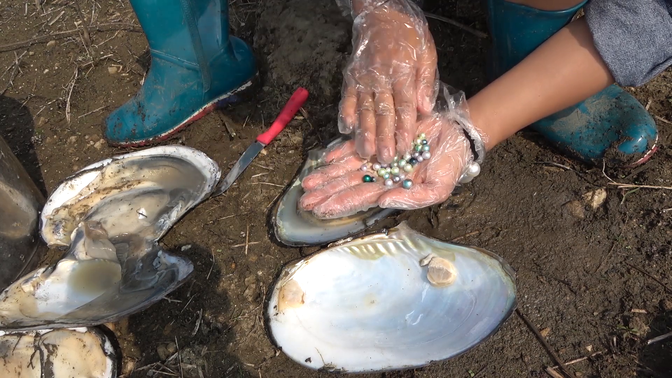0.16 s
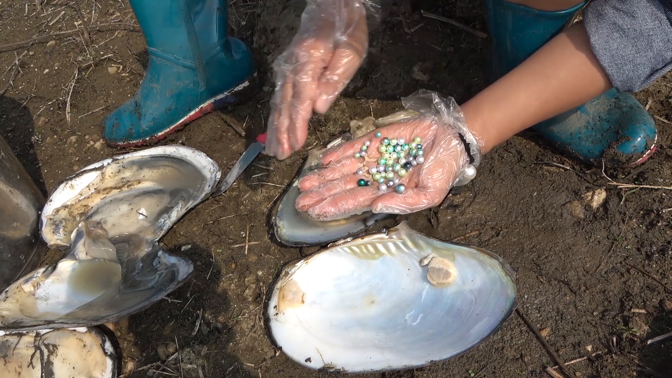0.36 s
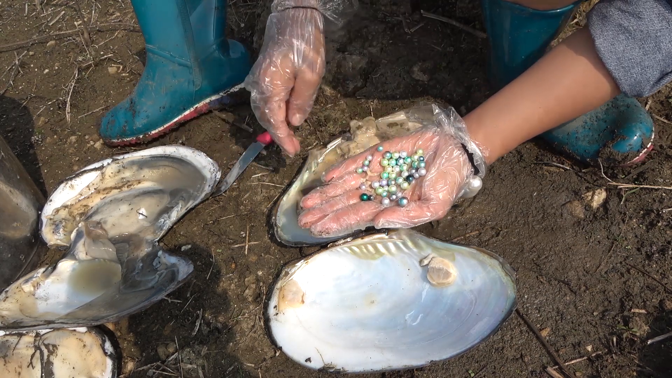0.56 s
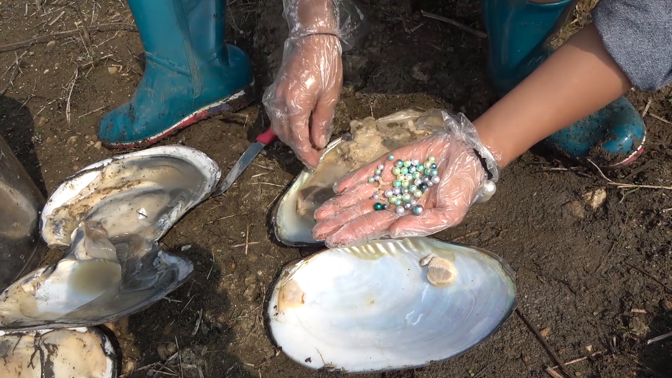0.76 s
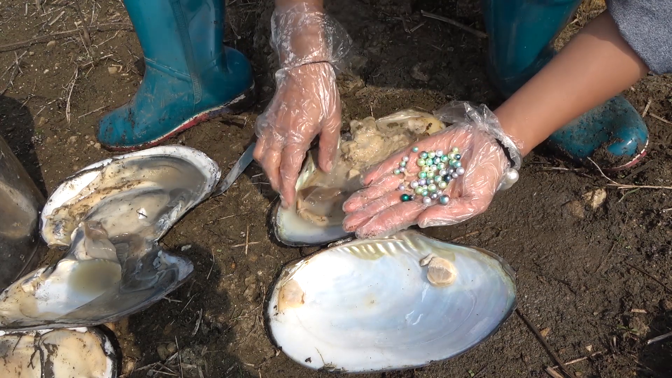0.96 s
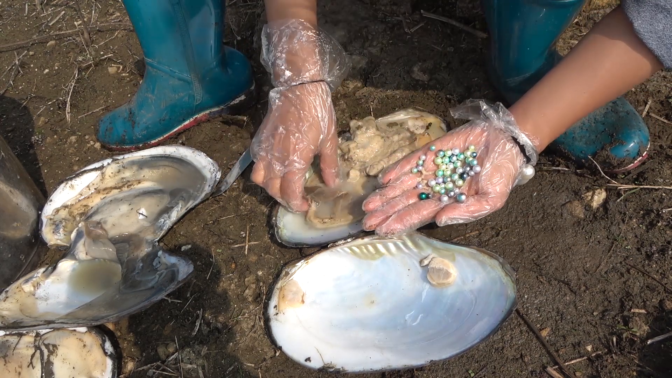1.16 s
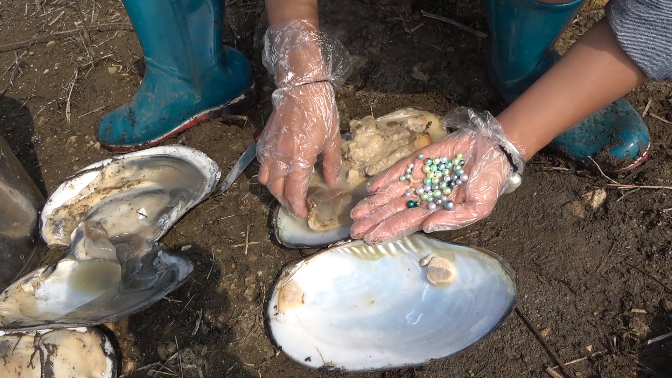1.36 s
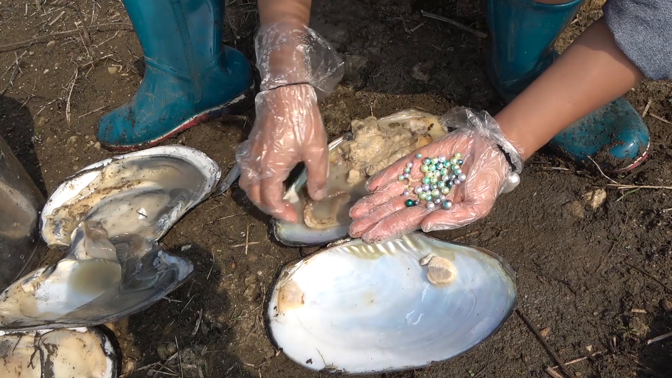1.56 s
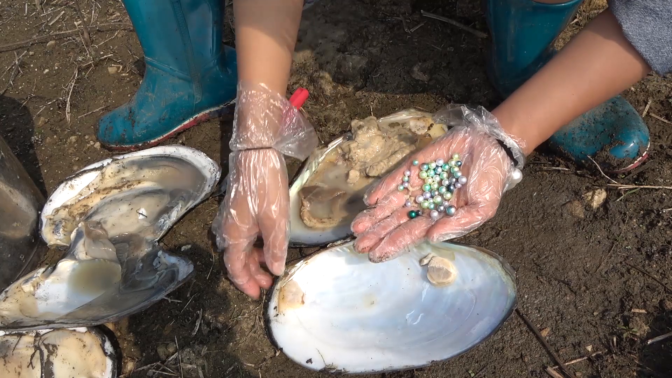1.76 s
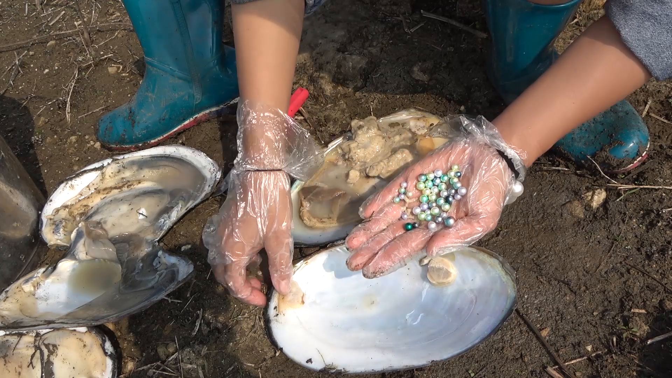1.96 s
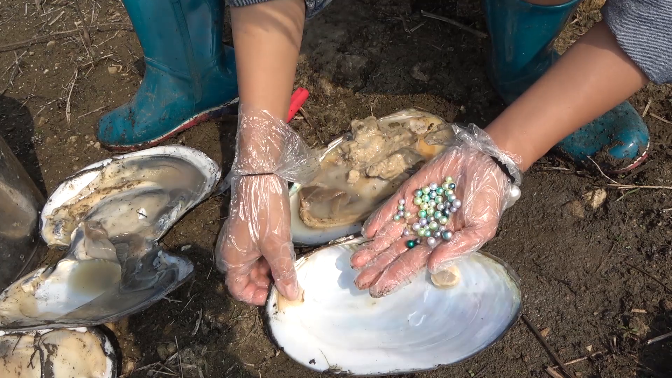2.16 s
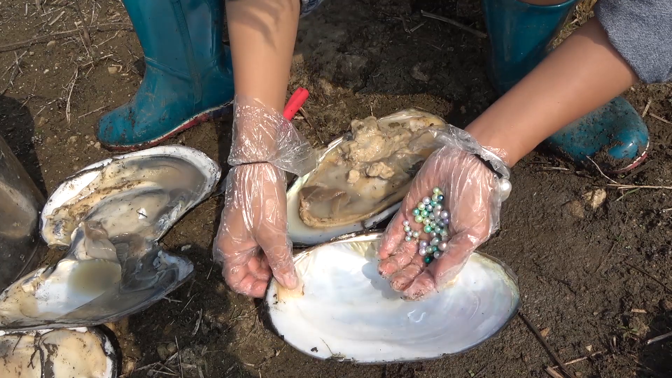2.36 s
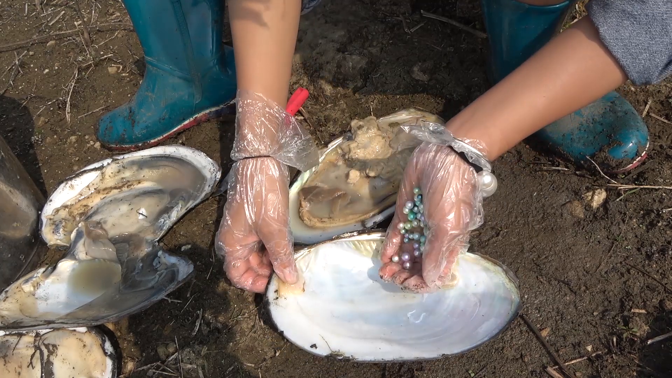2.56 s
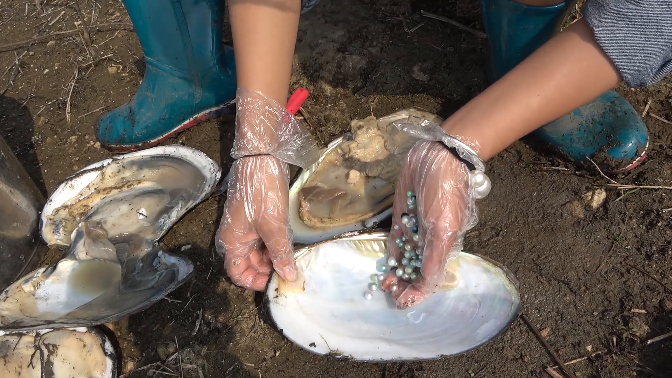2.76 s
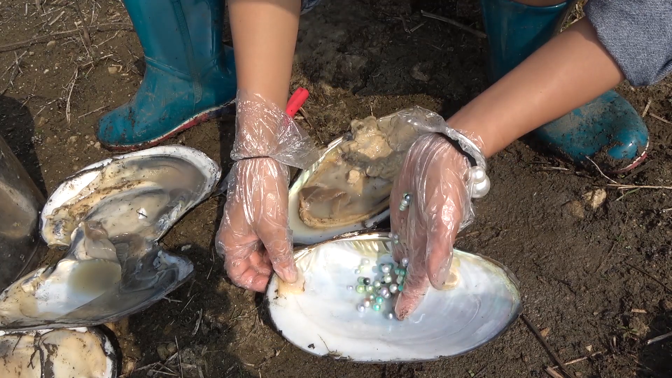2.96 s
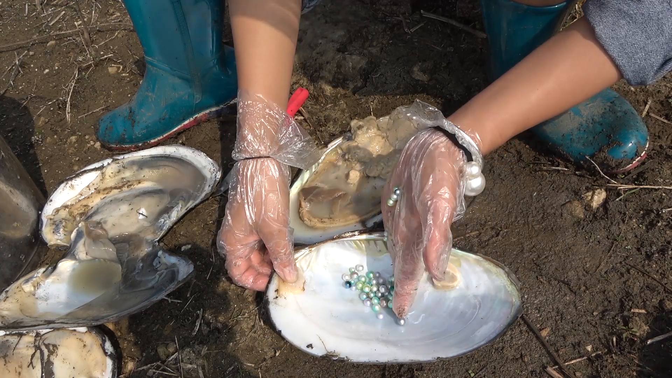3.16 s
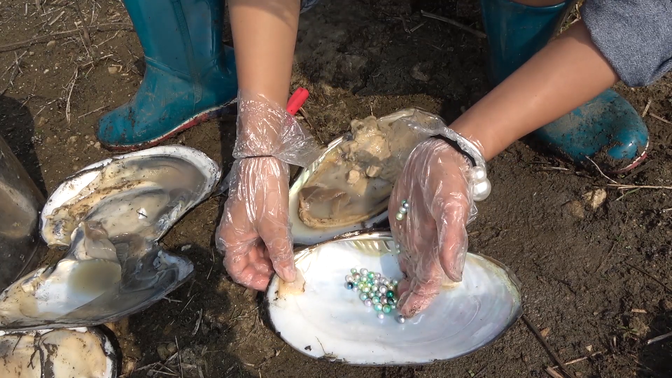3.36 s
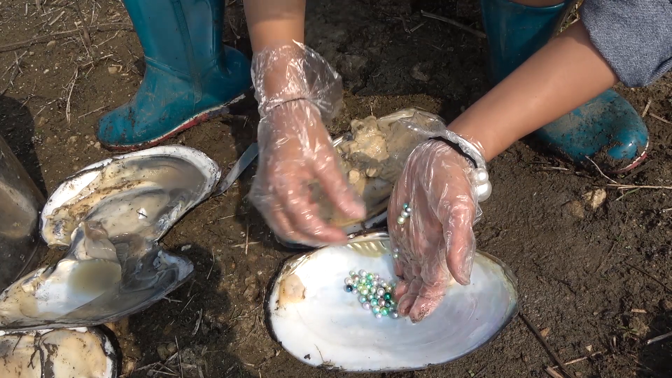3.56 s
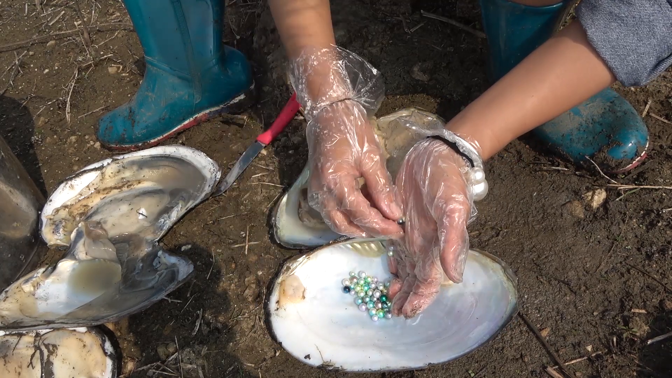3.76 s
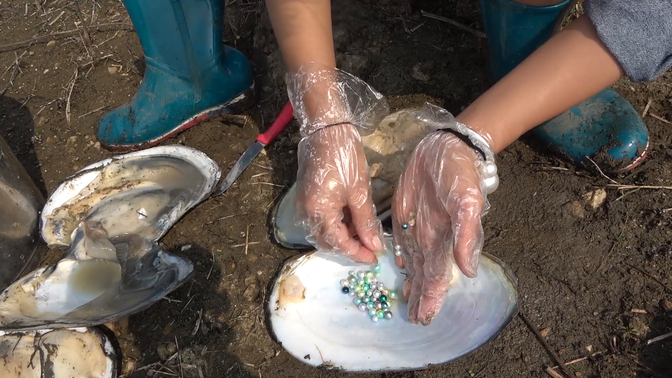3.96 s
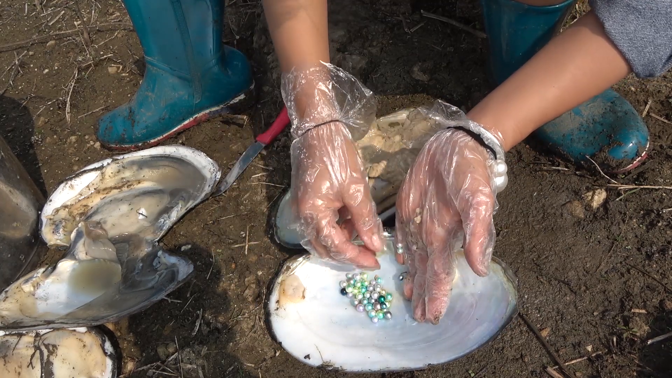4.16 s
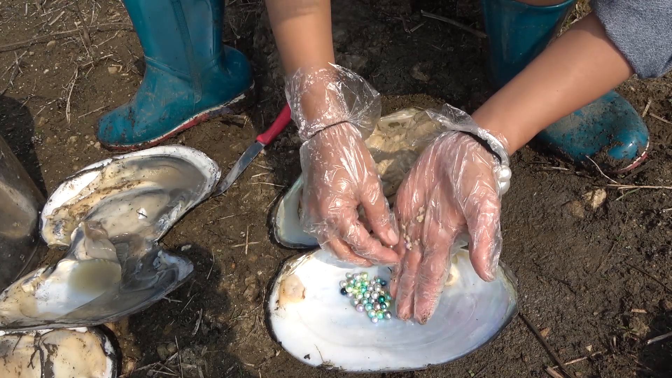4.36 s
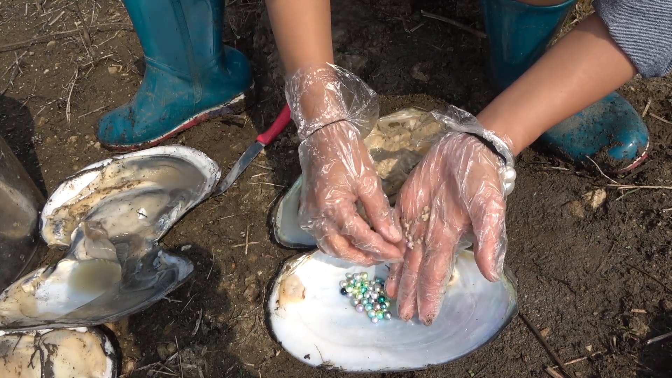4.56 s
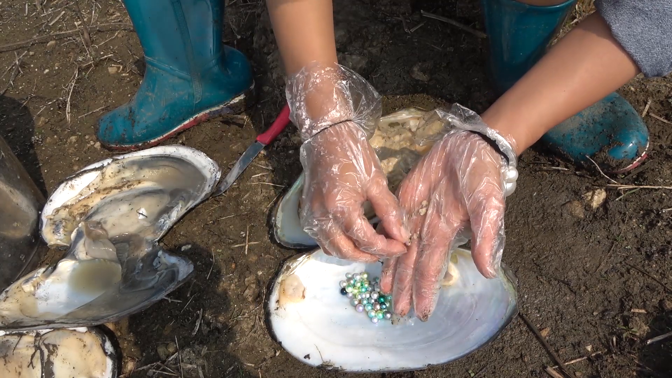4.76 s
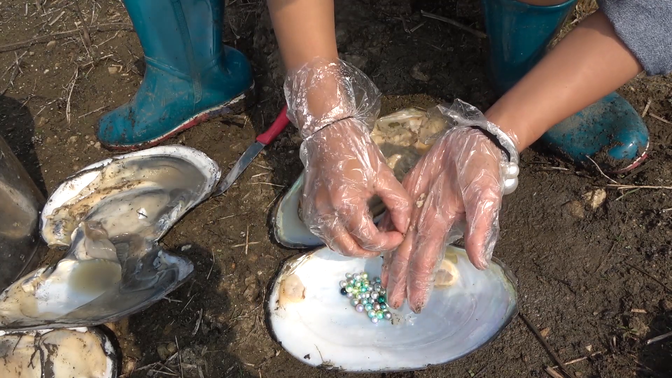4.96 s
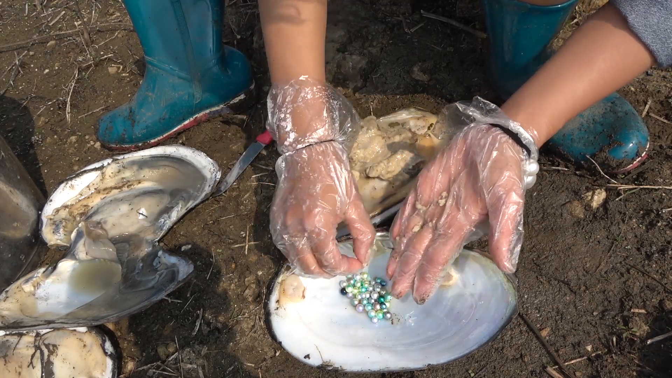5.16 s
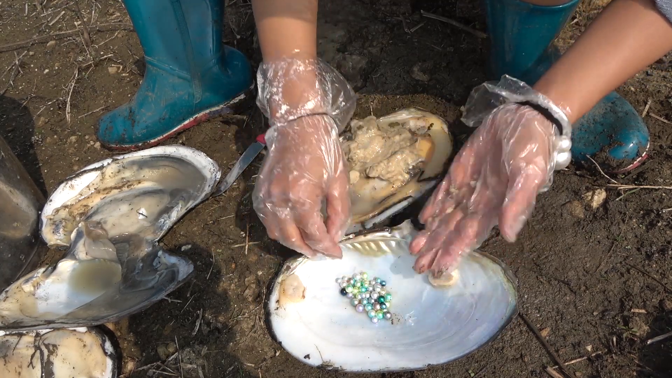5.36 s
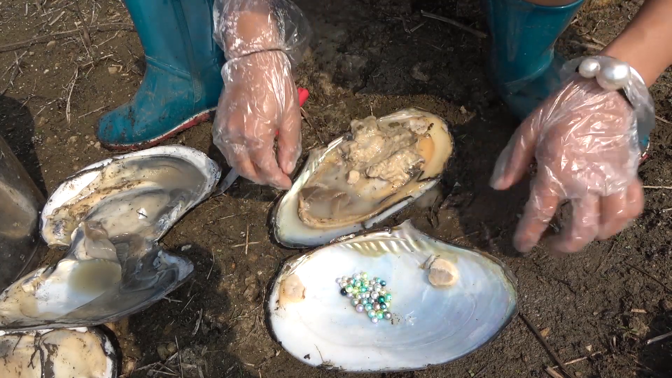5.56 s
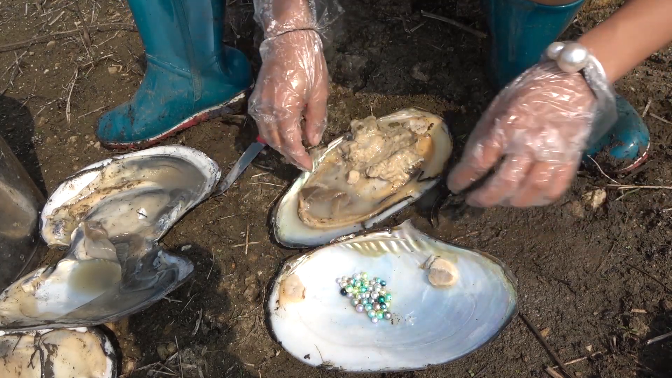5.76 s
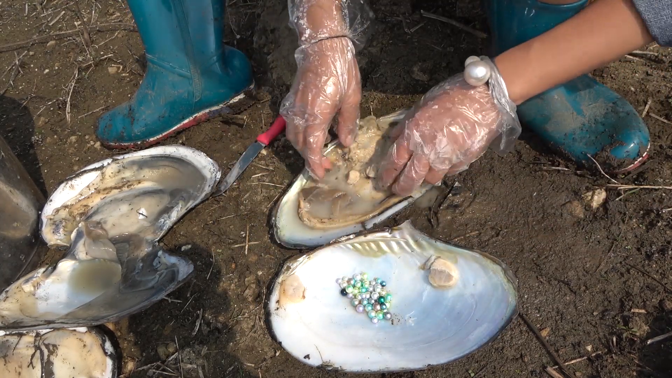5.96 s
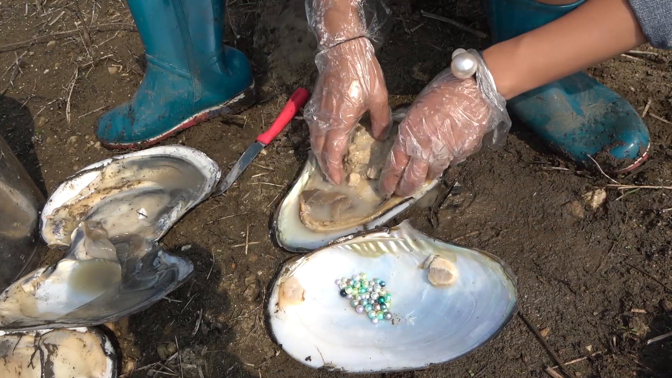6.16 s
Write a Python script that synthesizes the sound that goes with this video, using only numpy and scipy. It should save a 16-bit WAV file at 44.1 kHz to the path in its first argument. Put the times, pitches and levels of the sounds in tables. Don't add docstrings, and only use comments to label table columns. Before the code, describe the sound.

Thin plastic gloves crinkle and snap, then a palmful of pearls patters brightly into an empty mussel shell, with a scrape and a few last drops outdoors.

```python
import sys
import numpy as np
from scipy import signal
from scipy.io import wavfile

SR = 44100
rng = np.random.default_rng(int(sys.argv[2]) if len(sys.argv) > 2 else 0)


def to_wav(s):
    ch = np.atleast_2d(s).T
    pcm = np.round(np.clip(ch, -1, 1) * 32767)
    wavfile.write(sys.argv[1], SR, pcm.astype(np.int16))


def decibels_to_gain(level_db):
    exponent = np.asarray(level_db, float) / 20
    return 10 ** exponent


N = 273861

# [f/Hz, likeness 0..1]
AIR_SPECTRUM = [(21, -29), (35, -10.5), (115, -2.5), (310, -10), (442, -9.5), (630, -19), (734, -15),
                (7760, -19), (12900, -29), (15000, -26)]
AIR_LIKENESS = [(60, 0.97), (240, 0.86), (950, 0.88), (3770, 1), (15000, 0.31)]
AIR_DB = -52.5
# [f/Hz, width/Hz, level/dB]
PUMP_LINES = [(117.8, 17, -62), (169.4, 17, -68)]
# [t/s, level/dB]
PUMP_WHINE = [(3.4, -84), (3.7, -60.5), (4.9, -64), (5.2, -72), (5.8, -61), (6.21, -62)]
HUM_HZ, HUM_DB = 48.8, -58
# [peak t/s, level/dB]
GUSTS = [(0.0, -61), (1.71, -60), (2.3, -48), (2.47, -57), (2.62, -54), (2.97, -50), (3.72, -52),
         (4.1, -56), (4.46, -59), (5.11, -54), (5.63, -51.5), (5.85, -57), (6.1, -48)]
GUST_BUILD_S, GUST_LOSE_S, CALM_DB = .11, .1, -66
# [t/s, level/dB, width/ms]
PUFFS = [
    (2.247, -30, 5.0),
    (2.303, -28.5, 3.2),
    (2.319, -32, 4.0),
]
REBOUND_WIDTHS, REBOUND_DB = 2.2, -1.5
# [t/s, left minus right level/dB]
HAND_PLACE = [(0.0, -0.5), (1.21, 0.0), (3.03, -1), (3.86, 0.5), (3.96, -0.5), (5.29, -0.5), (5.67, -3.0),
              (6.21, -0.5)]
# [peak t/s, level/dB, 10 dB build/s, 10 dB loss/s]
HAND_MOVES = [(0.095, -37, .12, .05), (0.32, -43, .22, .07), (0.53, -44.5, .22, .35), (1.05, -44, .3, .12),
              (1.21, -46.5, .15, .1), (1.44, -45, .11, .13), (1.58, -44.5, .06, .08), (1.72, -47, .1, .6),
              (2.0, -50, .8, .08), (2.19, -41.5, .07, .9), (2.42, -38, .2, .45), (3.05, -40.5, .6, .3),
              (3.35, -42, .05, .14), (3.52, -41, .06, .06), (3.64, -40.5, .14, .12),
              (3.83, -39.5, .24, .07), (3.93, -42, .08, .2), (4.3, -41.5, .24, .07), (4.43, -41, .08, .12),
              (4.62, -48, .2, .5), (4.9, -45, .18, .25), (5.07, -44.5, .4, .16), (5.28, -42, .1, .16),
              (5.47, -39.5, .1, .3), (5.58, -36, .2, .15), (5.66, -36, .2, .07), (5.85, -40, .17, .8),
              (6.07, -39, .25, .3)]
# [peak t/s, level/dB, 10 dB build/s, 10 dB loss/s]
FINGER_RUBS = [(0.76, -53, .1, .05), (1.48, -51, .08, .1), (1.73, -53, .06, .3), (1.96, -55, .3, .06),
               (2.16, -49, .06, .3), (2.42, -48, .25, .22), (2.83, -55, .12, .08), (3.25, -44.5, .06, .04),
               (3.36, -52, .06, .06), (3.57, -51, .1, .13), (4.09, -50.5, .04, .25),
               (5.65, -48.5, .18, .07)]
FILM_REST_DB, RUB_UNDER_FILM_DB = -58, -18
# [f/Hz, level/dB]
FILM_SPECTRUM = [(1800, -29), (2500, -5.5), (3500, -2), (5000, -2.5), (7000, 2), (9500, -2.5),
                 (12500, -5.5), (15500, -40)]
RUB_SPECTRUM = [(800, -8), (1100, 2.5), (1500, 0.5), (2000, -2), (2600, 0)]
# [t/s, peak level/dB, pitch f/Hz]
SNAPS = [(0.0751, -25, 6800), (0.0876, -19.5, 9400), (0.0966, -18, 7600), (0.184, -34, 6700),
         (0.33, -29, 7900), (1.4415, -29, 7750), (1.5858, -26, 8000), (2.025, -30, 5200),
         (2.0622, -31, 7140), (2.5736, -29, 7600), (2.5846, -23, 8250), (2.605, -25, 8300),
         (2.6478, -22, 8500), (2.652, -26, 6400), (2.6814, -28, 8000), (2.7237, -25, 10100),
         (2.7316, -28, 5950), (2.742, -26, 5400), (2.7653, -23, 7900), (2.7693, -21, 7600),
         (3.7627, -26, 7500), (3.821, -24, 7500), (3.9498, -29, 10700), (4.3396, -31, 9900),
         (4.8802, -27, 10200), (4.918, -27, 7900), (5.008, -25.5, 9700), (5.0573, -32, 5900),
         (5.3092, -30, 8100), (5.4486, -28, 7800)]
# [t/s, peak
# level/dB, pitch f/Hz]
CREASES = [(.053, -37, 10100), (.0716, -32, 5070), (.0913, -35, 5800), (.106, -35, 6400),
           (.1104, -32, 4900), (.1143, -29, 3600), (.612, -36, 3400), (3.458, -39, 4500),
           (3.5245, -21, 3700), (3.526, -26, 7200), (4.738, -38, 3400), (5.582, -29, 4200),
           (5.687, -27, 3100)]
# [t/s, peak level/dB, pitch f/Hz]
FOLDS_EARLY = [(0.0813, -23, 6860), (0.191, -38, 6720), (0.2409, -35, 8720), (0.3499, -32, 6870),
               (0.3599, -30, 5920), (0.4021, -35, 10480), (0.4396, -34, 5980), (0.5139, -31, 5910),
               (0.5322, -32, 6560), (0.5546, -33, 9960), (0.6299, -34, 8900), (0.6483, -35, 11990),
               (0.7231, -35, 5150), (0.7476, -37, 3090), (0.7748, -37, 2510), (0.8547, -34, 8310),
               (0.8717, -36, 8930), (0.9137, -34, 10630), (0.9733, -34, 9750), (1.0327, -33, 4460),
               (1.1305, -36, 9450), (1.1574, -34, 8040), (1.2128, -35, 11960), (1.2298, -35, 9270),
               (1.25, -35, 10030), (1.3751, -37, 7240), (1.4921, -33, 4210), (1.5806, -33, 8150),
               (1.6083, -33, 8670), (1.6141, -34, 11420), (1.6932, -36, 8790), (1.7709, -36, 8680),
               (2.0202, -37, 8200), (2.2413, -28, 7550), (2.3446, -28, 7050), (2.362, -26, 7170),
               (2.4266, -27, 5080), (2.4302, -27, 3290), (2.4556, -28, 8040), (2.5348, -24, 7450),
               (2.737, -31, 6750), (2.7739, -26, 5170), (3.4925, -30, 7800), (3.6952, -33, 8720),
               (3.7382, -31, 8330)]
# [t/s, peak level/dB, pitch f/Hz]
FOLDS_LATE = [(3.8348, -26, 8170), (3.8572, -28, 7620), (3.8935, -32, 6900), (3.9234, -30, 10630),
              (4.0155, -33, 8260), (4.2283, -33, 4170), (4.3617, -36, 6150), (4.3852, -32, 7310),
              (4.4236, -29, 6920), (4.5296, -35, 7320), (4.5412, -36, 6930), (4.7561, -35, 3240),
              (4.763, -34, 8240), (4.7696, -35, 7470), (4.821, -35, 5980), (4.8348, -35, 4760),
              (4.8713, -33, 8330), (4.8922, -31, 6180), (4.9446, -34, 10010), (4.953, -34, 7190),
              (5.0033, -34, 10750), (5.0543, -33, 7160), (5.1668, -37, 8250), (5.1713, -37, 7890),
              (5.1858, -36, 10170), (5.2329, -34, 6000), (5.2778, -30, 6400), (5.3815, -33, 6900),
              (5.436, -30, 6780), (5.5799, -26, 11400), (5.5853, -25, 6590), (5.6156, -26, 6550),
              (5.6569, -26, 8260), (5.7362, -31, 7250), (5.8538, -28, 8950), (5.9098, -27, 6890),
              (5.9124, -30, 5880), (5.9757, -29, 6160), (5.9847, -30, 6140), (6.0032, -30, 10760),
              (6.0322, -28, 8250), (6.0917, -28, 7060), (6.1158, -25, 9120), (6.1282, -29, 5440),
              (6.1405, -27, 6900)]
# [peak t/s, level/dB, 10 dB build/s, 10 dB loss/s]
SQUELCHES = [(.62, -60, .45, .25), (1.05, -54.5, .2, .08), (2.3, -60, .7, .45), (3.59, -49.5, .05, .08),
             (5.5, -59.5, 1.6, 1.5), (6.21, -56, .15, .1)]
MUD_REST_DB = -70
# [f/Hz, level/dB, time to fall 60 dB/s]
DEEP_MODES = [(1060, -10, 0.051), (1190, 1.5, 0.025), (1298, -0.5, 0.014), (1460, -6, 0.014),
              (1640, -5, 0.009), (1803, -5, 0.03), (2080, -2, 0.009)]
BODY_MODES = [(2423, -16, 0.035), (2490, -3, 0.016), (3072, -1, 0.025), (3304, 1, 0.011),
              (3530, -0.5, 0.017), (4020, 0.5, 0.0093), (3800, -12, 0.02)]
BRIGHT_MODES = [(4900, -3, 0.014), (5470, 3, 0.0087), (6300, 3, 0.0073), (7350, 0, 0.015),
                (8000, 5, 0.0067), (8700, -2.5, 0.011), (9000, 0.5, 0.013), (10200, -6, 0.0049),
                (11300, -8, .006), (12600, -8, .006), (13800, -4, .006)]
# [t/s, body level/dB, bright over body level/dB, body f/Hz, bright f/Hz]
POUR = [(2.7853, -18, 5, 3200, 7640), (2.8043, -45, 20, 2900, 6500), (2.8323, -47, 24, 4200, 6490),
        (2.8367, -26, 12, 3680, 8020), (2.8539, -20, 4, 3230, 7380), (2.8735, -16, 2, 3330, 8800),
        (2.9095, -20, 8, 3530, 6180), (2.9264, -20, 6, 3550, 9800), (2.9324, -30, 5, 3610, 8610),
        (2.9377, -45, 17, 3480, 8980), (2.9406, -29, 6, 3380, 5820), (2.9736, -18, 1, 3060, 6990),
        (2.9772, -20, 6, 3600, 5710), (2.9847, -38, 14, 3570, 8230), (2.9922, -20, -1, 3250, 9550),
        (2.9983, -13, -1, 3310, 4610), (3.0186, -19, 2, 3110, 7240), (3.0247, -17, 1, 3200, 6090),
        (3.0299, -20, -3, 3120, 5860), (3.0342, -15, -2, 3250, 4610), (3.0374, -23, -4, 3060, 4610),
        (3.0446, -17, 5, 3600, 5560), (3.0581, -26, 1, 3100, 7300), (3.0648, -14, 0, 3200, 9210),
        (3.0712, -19, 5, 3680, 5900), (3.0822, -15, 1, 3130, 5820), (3.0879, -25, -3, 3080, 9000),
        (3.1038, -28, 8, 4060, 8800), (3.1077, -27, 6, 2500, 8230), (3.1171, -38, 14, 2960, 8140),
        (3.1261, -26, 5, 3470, 5590), (3.1309, -33, 6, 2930, 8690), (3.1381, -16, 0, 3210, 9120),
        (3.1512, -22, 0, 3040, 8720), (3.1642, -21, 6, 3690, 5790), (3.1996, -18, 5, 3110, 5630),
        (3.2171, -36, 9, 2620, 5650), (3.2404, -20, 4, 3640, 7660)]
# [t/s, body level/dB, bright over body level/dB, body f/Hz, bright f/Hz]
STRAYS = [(3.2848, -36, 5, 3350, 7740), (3.3053, -47, 12, 4190, 6890), (3.3333, -34, -3, 3050, 7110),
          (3.3425, -42, 9, 3950, 9140), (3.3496, -47, 13, 3190, 8460), (3.3645, -28, 2, 3120, 5390),
          (3.3782, -45, 12, 3180, 8760), (3.3906, -36, -4, 3080, 4610), (4.0333, -16, 1, 3340, 8410),
          (4.0386, -29, 3, 3180, 4610), (4.059, -14, -1, 3360, 8820), (4.071, -38, 4, 3220, 8740),
          (4.0893, -42, 8, 3780, 10220), (4.1132, -29, -1, 3240, 4610), (4.1546, -37, 4, 3870, 4610),
          (4.1808, -35, 2, 4200, 4610), (4.1851, -33, -5, 3260, 4610), (4.2766, -27, 6, 3150, 6930),
          (4.2977, -24, 0, 3360, 10120), (4.3092, -45, 13, 3460, 10690), (4.5637, -18, -8, 3250, 4610),
          (4.5704, -40, 9, 3060, 7960), (4.5829, -34, 13, 3660, 7290), (4.6139, -40, 4, 3470, 4610),
          (4.6237, -33, 6, 4200, 4610), (4.6649, -38, 6, 4200, 4610), (4.688, -27, -7, 3380, 4610),
          (4.6938, -41, 6, 3520, 4610), (4.7033, -54, 19, 3950, 5990), (4.7264, -36, -1, 3410, 4610),
          (5.3346, -29, 4, 3380, 9190), (5.3555, -40, 9, 4200, 4610)]
# [t/s, body level/dB, bright over body
# level/dB, body f/Hz, bright f/Hz]
MORE_HITS = [(2.9748, -22, 2, 3100, 7500), (3.0483, -24, -2, 3300, 7000), (3.1365, -24, 2, 3300, 9000),
             (3.1495, -25, 0, 3100, 6000), (4.0568, -21.5, 2, 3400, 9500), (4.6262, -32, -6, 3500, 7000),
             (5.319, -38, -6, 3200, 6000), (5.3342, -31, 2, 2500, 4900)]
# [t/s, bright level/dB, bright f/Hz]
TAPS = [(2.8092, -32, 7380), (2.8148, -30, 10080), (2.8847, -33, 7140), (2.8886, -33, 8210),
        (2.8917, -30, 8560), (2.9479, -31, 8550), (3.0997, -30, 4610), (3.1332, -28, 8430),
        (3.1692, -29, 4610), (3.1733, -30, 5730), (3.1764, -28, 9110), (3.1908, -29, 7690),
        (3.2241, -37, 5440), (3.2309, -38, 4610)]
TAP_BODY_UNDER_DB, TAP_BODY_HZ = 9, 3200
ON_PEARLS = [2.9921, 3.0298, 3.0483, 3.1076, 3.2395, 4.297, 4.6643, 4.6879, 4.7263]
# [t/s, level/dB]
ROLLING = [(2.7, -56), (2.8, -52), (2.95, -49), (3.05, -43.5), (3.18, -37), (3.27, -60), (3.42, -52),
           (3.46, -71)]
OPPOSED_SIGMA = .75
DEEP_DB, DEEP_FOLLOWS, CUSHION_DB = -18, .68, -9
# [peak t/s, level/dB]
DRAG_SLIPS = [(3.483, -41), (3.496, -32), (3.509, -32), (3.521, -29), (3.531, -36), (3.546, -38),
              (3.557, -37), (3.573, -39)]
SLIP_BUILD_S, SLIP_LOSE_S = .012, .008
# [f/Hz, level/dB, time to fall 60 dB/s]
DRAG_MODES = [(446, -6.5, 0.02), (750, -5, 0.011), (1140, -0.5, 0.026), (1324, -0.5, 0.026),
              (1760, 0, 0.024), (2100, -6, .012), (2640, -0.5, .018), (2930, -3, 0.022), (3600, -1, 0.012),
              (4740, -6, 0.014), (7200, -2, 0.0086)]


def rms_one(x):
    return x / np.sqrt(np.mean(x ** 2) + 1e-20)


def in_time(rows, outside=None):
    s, *columns = np.transpose(rows)
    t = np.arange(N) / SR
    return [np.interp(t, s, column, outside, outside) for column in columns]


def at_hz(points, hz):
    point_hz, point_db = np.array(points)[:, 0], np.array(points)[:, 1]
    return np.interp(np.log(hz), np.log(point_hz), point_db)


def band(x, low_hz, high_hz, order=2):
    sos = signal.butter(order, [low_hz, high_hz], "band", fs=SR, output="sos")
    return signal.sosfilt(sos, x)


def drift(rate):
    r = np.exp(-80 * np.pi * rate / SR)
    noise = rng.standard_normal(N // 40 + 2002)
    slow = rms_one(signal.lfilter([1], [1, -2 * r, r * r], noise)[2000:])
    return np.interp(np.arange(N) / 40, np.arange(len(slow)), slow)


def swells(rows, rest_db):
    t = np.arange(N) / SR
    level_db = np.full(N, float(rest_db))
    for s, peak_db, build_s, lose_s in rows:
        away = np.maximum((s - t) / build_s, (t - s) / lose_s)
        level_db = np.maximum(level_db, peak_db - 10 * away)
    return level_db


def ring(clicks, hz, t60):
    r = decibels_to_gain(-60 / (t60 * SR))
    w = 2 * np.pi * hz / SR
    return signal.lfilter([0, np.sin(w)], [1, -2 * r * np.cos(w), r * r], clicks + 1e-18)


def grains(per_s, spread_db):
    sizes = decibels_to_gain(spread_db * np.minimum(rng.exponential(1, N), 4))
    signs = rng.choice([-1, 1], N)
    return sizes * signs * (rng.random(N) < per_s / SR)


def crinkle(clicks, spectrum, cycles, count):
    pitches = np.geomspace(spectrum[0][0], spectrum[-1][0], count)
    facet = rng.integers(0, count, N)
    out = np.zeros(N)
    for k, hz in enumerate(pitches):
        out += decibels_to_gain(at_hz(spectrum, hz)) * hz * ring(clicks * (facet == k), hz, cycles / hz)
    return rms_one(out)


def spread(x, pan_db, width_db, lag=2):
    slope = decibels_to_gain(width_db) * (np.roll(x, -lag) - np.roll(x, lag))
    return np.array([decibels_to_gain(pan_db / 2) * (x + slope), decibels_to_gain(-pan_db / 2) * (x - slope)])


def field():
    out = np.zeros((2, N))
    edges = 40 * 2 ** np.arange(0, 8.7, .5)
    white = rng.standard_normal((2, 2, N))
    for k, (low, high) in enumerate(zip(edges, edges[1:])):
        mid, side = band(white[k % 2], low, high)
        hz = np.sqrt(low * high)
        alike = np.clip(at_hz(AIR_LIKENESS, hz), -1, 1)
        level = decibels_to_gain(at_hz(AIR_SPECTRUM, hz) + 0.66 * drift(1))
        out += level * (np.sqrt(1 + alike) * mid + np.sqrt(1 - alike) * side * [[1], [-1]])
    return decibels_to_gain(AIR_DB) * rms_one(out)


def drone_line(hz, width_hz):
    t60 = 2.2 / width_hz
    once = ring(rng.standard_normal(N), hz, t60)
    return rms_one(ring(once, hz, t60))


def pump():
    hum_hz = HUM_HZ + 1.35 * drift(4.9)
    out = decibels_to_gain(HUM_DB + 2.0 + 2.0 * drift(2.8)) * np.sin(2 * np.pi * np.cumsum(hum_hz) / SR)
    for hz, width_hz, db in PUMP_LINES:
        out += decibels_to_gain(db) * drone_line(hz, width_hz)
    return out + decibels_to_gain(in_time(PUMP_WHINE)[0]) * drone_line(353.5, 30)


def wind():
    t = np.arange(N) / SR
    level_db = swells([(s, db, GUST_BUILD_S, GUST_LOSE_S) for s, db in GUSTS], CALM_DB)
    lumps = rng.standard_normal(N) * decibels_to_gain(0.91 * drift(9.2))

    def bump(s, ms):
        return np.exp(-8 * ((t - s) / ms * 1000) ** 2)

    jolts = np.zeros(N)
    for s, db, ms in PUFFS:
        rebound = decibels_to_gain(REBOUND_DB) * bump(s + REBOUND_WIDTHS * ms / 1000, 2 * ms)
        jolts += decibels_to_gain(db) * (bump(s, ms) - rebound)
    return decibels_to_gain(level_db + 4.0) * rms_one(band(lumps, 23, 104)) + band(jolts, 14, 400, order=1)


def gloves():
    film_db = swells(HAND_MOVES, FILM_REST_DB)
    rub_db = np.maximum(film_db + RUB_UNDER_FILM_DB, swells(FINGER_RUBS, -200))
    clump = drift(49)
    denser_db = .4 * np.maximum(film_db + 45, 0)
    folds = decibels_to_gain(-denser_db / 2) * grains(7000 * decibels_to_gain(1.4 * clump + denser_db), spread_db=3.0)
    film = crinkle(folds, FILM_SPECTRUM, cycles=15.6, count=22)
    ticks = rms_one(band(grains(500, spread_db=4.5), 4800, 14300))
    rub_grains = grains(2500 * decibels_to_gain(2.0 * clump), spread_db=3.0)
    rub = crinkle(rub_grains, RUB_SPECTRUM, cycles=15.4, count=10)
    crackle = band(film + decibels_to_gain(-12.0) * ticks, 2230, 18600, order=3)
    rustle = decibels_to_gain(film_db + 0.5 + 0.7 * drift(25)) * crackle
    return rustle + decibels_to_gain(rub_db + 0.5) * band(rub, 760, 3500)


def snaps():
    size = 300
    out = np.zeros(N + size)
    t = np.arange(size) / SR
    for s, peak_db, hz in list(SNAPS) + list(CREASES) + list(FOLDS_EARLY) + list(FOLDS_LATE):
        tail = rng.standard_normal(size) * decibels_to_gain(-9.0 - 60 * t / 0.007)
        push = tail + (t == 0)
        start = round(s * SR)
        out[start:start + size] += decibels_to_gain(peak_db + 1.5) * (ring(push, hz, 8.0 / hz) + .3 * push)
    return band(out[:N], 2300, 21000, order=3)


def squelch():
    pop_spectrum = [(220, -12), (420, -3), (750, -5)]   # f/Hz, level/dB
    pops = crinkle(grains(500, spread_db=2.5), pop_spectrum, cycles=13.0, count=8)
    return decibels_to_gain(swells(SQUELCHES, MUD_REST_DB)) * pops


def contacts():
    taps = [(s, db - TAP_BODY_UNDER_DB, TAP_BODY_UNDER_DB, TAP_BODY_HZ, hz) for s, db, hz in TAPS]
    return np.transpose(list(POUR) + list(STRAYS) + list(MORE_HITS) + taps)


def pearls():
    s, body_db, bright_db, body_hz, bright_hz = contacts()
    at = np.round(s * SR).astype(int)
    out = np.zeros(N)
    jostle = decibels_to_gain(in_time(ROLLING, outside=-120)[0] - 20.0) * grains(630, spread_db=3.5)
    cushioned = np.min(abs(s[:, None] - np.array(ON_PEARLS)), axis=1) < .0015
    deep_db = DEEP_DB + DEEP_FOLLOWS * body_db + CUSHION_DB * cushioned
    # modes, blow dB, favoured Hz, focus on it (dB per octave squared), chance dB, lowest Hz
    families = (
        (DEEP_MODES, deep_db, body_hz, 0, 2.8, 950),
        (BODY_MODES, body_db + 2.0, body_hz, 45.0, 2.0, 1500),
        (BRIGHT_MODES, body_db + bright_db + 3.0, bright_hz, 11.0, 3.0, 3600))
    for modes, blow_db, favoured_hz, focus_db, chance_db, low_hz in families:
        hz, level_db, t60 = np.transpose(modes)
        shape = (len(at), len(hz))
        off_octaves = np.log2(hz / favoured_hz[:, None])
        share = decibels_to_gain(level_db + chance_db * rng.standard_normal(shape) - focus_db * off_octaves ** 2)
        share /= np.sqrt(np.sum(share ** 2, axis=1, keepdims=True))
        if modes is BRIGHT_MODES:
            sense = rng.choice([-1, 1], shape)
        else:
            sense = np.where(rng.standard_normal(shape) > OPPOSED_SIGMA, -1, 1)
        family = np.zeros(N)
        for k in range(len(hz)):
            clicks = jostle * decibels_to_gain(level_db[k])
            clicks[at] = decibels_to_gain(blow_db) * share[:, k] * sense[:, k]
            family += ring(clicks, hz[k], t60[k])
        out += band(family, low_hz, 12000)
    crack = np.zeros(N)
    crack[at] = decibels_to_gain(body_db + 0.8 * bright_db)
    fade = signal.lfilter([1], [1, -decibels_to_gain(-60 / (0.01 * SR))], crack + 1e-18)
    burst = fade * rng.standard_normal(N)
    return out + band(decibels_to_gain(1.5) * burst - decibels_to_gain(5.5) * crack, 2600, 11800)


def drag():
    level_db = swells([(s, db, SLIP_BUILD_S, SLIP_LOSE_S) for s, db in DRAG_SLIPS], rest_db=-120)
    slips = grains(4000, spread_db=3.5) * decibels_to_gain(1.2 * drift(60))
    scrape = .5 * band(slips, 800, 4000)
    for k, (hz, db, t60) in enumerate(DRAG_MODES):
        scrape += decibels_to_gain(db) * ring(slips, hz, t60) * (-1) ** k
    return decibels_to_gain(level_db - 1.8) * rms_one(scrape)


def scene():
    around = field() + spread(pump() + wind(), -0.77, -19, lag=41)
    hands = spread(gloves() + snaps(), in_time(HAND_PLACE)[0] - .4, -25, lag=1)
    mud = spread(squelch(), 1.5, -18.5, lag=15)
    shell = spread(pearls() + drag(), -1.5, -23, lag=1)
    return around + hands + mud + shell


def band_limit(x):
    return signal.sosfilt(signal.butter(12, 16970, fs=SR, output="sos"), x)


def record(dry):
    rounded = .8 * np.tanh(dry / .8)
    top_cut = signal.cheby2(10, 30, 16100, fs=SR, output="sos")
    mix = signal.sosfilt(top_cut, rounded)
    return band_limit(mix)


dry = scene()
out = record(dry)
to_wav(out)
```